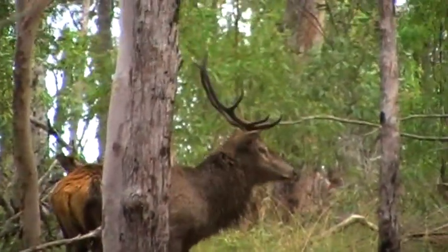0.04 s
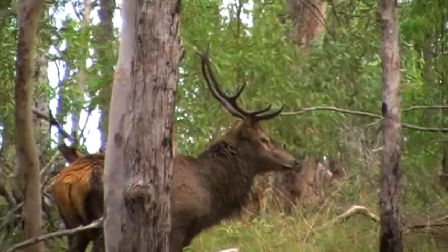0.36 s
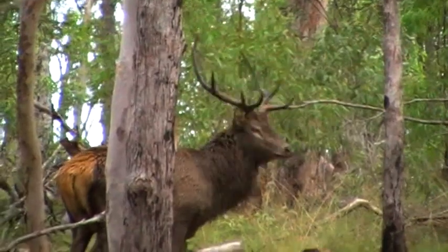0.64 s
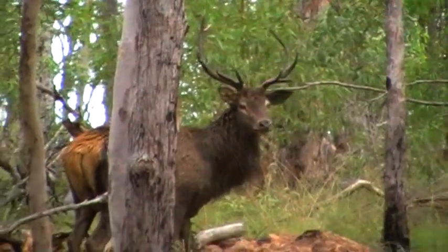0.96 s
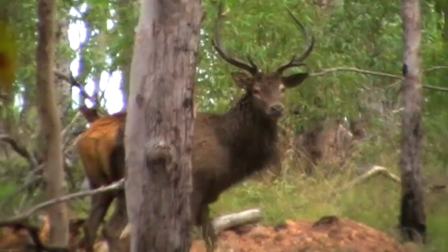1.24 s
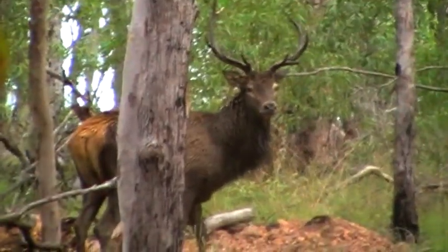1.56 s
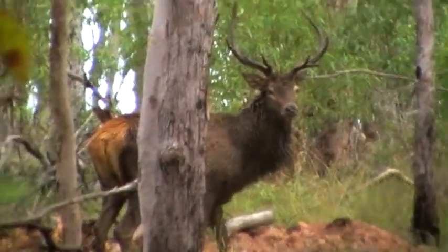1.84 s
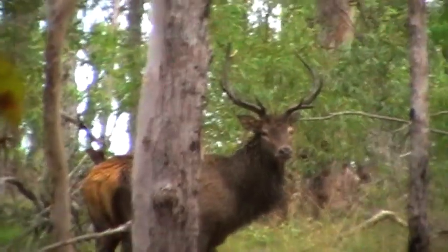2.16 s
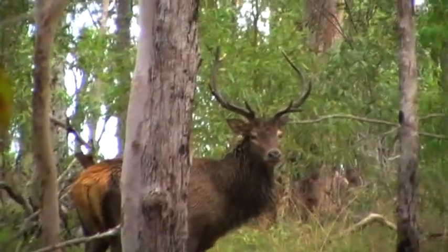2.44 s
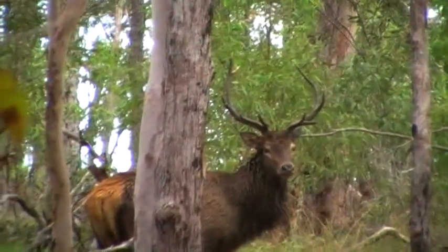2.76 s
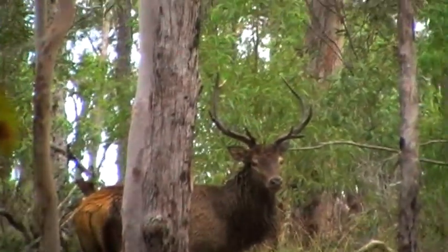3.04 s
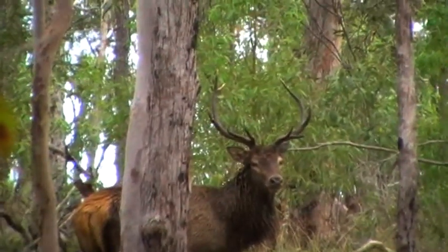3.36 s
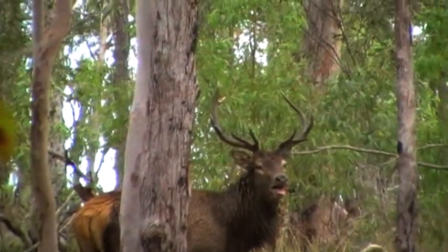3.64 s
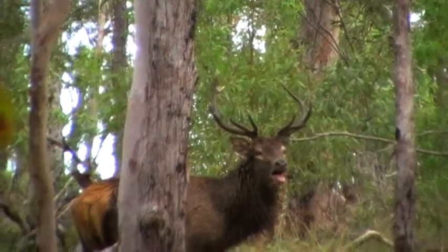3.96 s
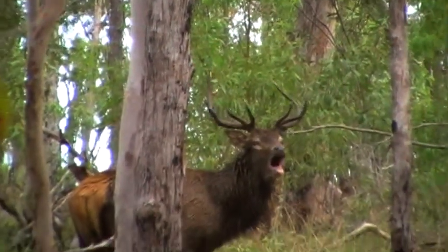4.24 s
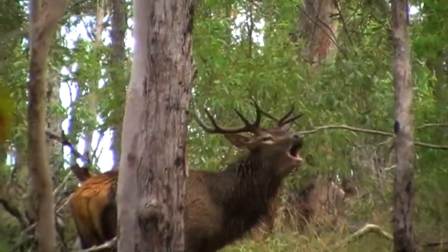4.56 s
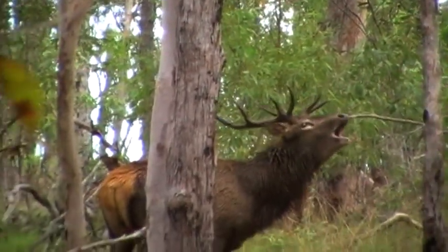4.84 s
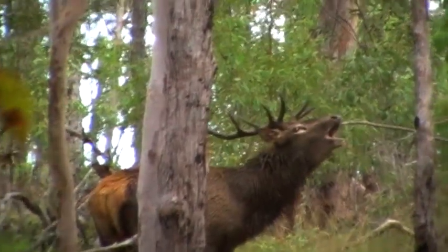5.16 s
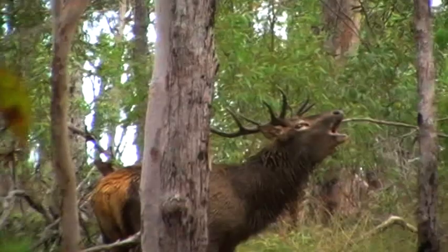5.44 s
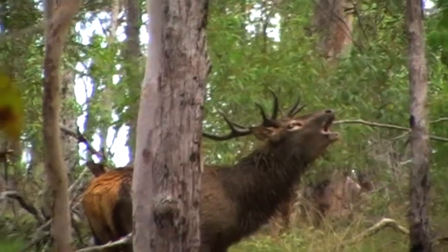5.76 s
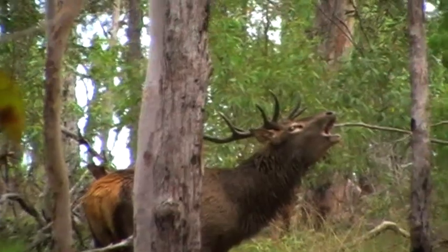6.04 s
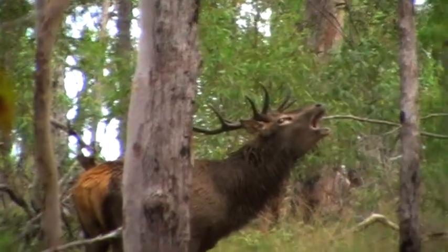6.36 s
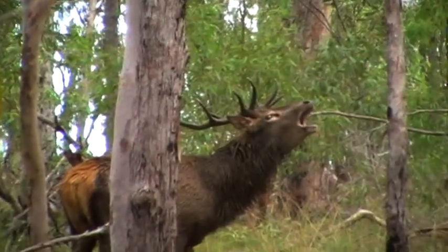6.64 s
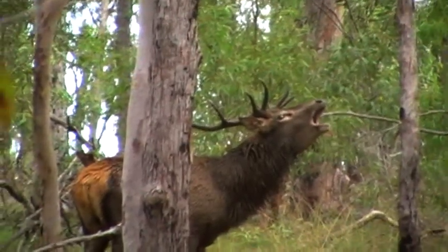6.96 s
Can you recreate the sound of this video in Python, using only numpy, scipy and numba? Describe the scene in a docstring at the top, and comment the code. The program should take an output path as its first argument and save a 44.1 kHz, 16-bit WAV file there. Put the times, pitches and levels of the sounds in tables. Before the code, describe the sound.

A deer stag roars outdoors among trees, a little to the right. Before it calls, there is only low forest air, faraway chirping birds, some slight wooden ticks and the camera's thin whine. Just past halfway, a short creaky growl deepens and swells into one long, loud bellow, rising and dipping in pitch and growing raspy. The trunks scatter the call lightly, and a few chirps come through at the end.

```python
"""Far birds chirp and a few twigs tick over the hush of open woodland and a faint camera whine.
Then a red deer stag roars: a rattling growl that drops as the larynx sinks, opening into a long
bellow that wavers in pitch and turns hoarse. Snapping vocal folds and puffs of air ring the throat,
mouth and lips, and the tree trunks scatter the voice."""
import sys
import numpy as np
from scipy import signal
from scipy.fft import rfft, irfft
from scipy.io import wavfile
from scipy.ndimage import uniform_filter1d
from numba import njit

SR = 44100
rng = np.random.default_rng(int(sys.argv[2]) if len(sys.argv) > 2 else 0)


def output_pcm(signal):
    """Save a mono or channel-first signal as 16-bit PCM at the path in sys.argv[1].

    Samples are clipped to [-1, 1] before scaling.
    """
    pcm = np.clip(np.atleast_2d(signal).T, -1, 1) * 32767
    wavfile.write(sys.argv[1], SR, np.round(pcm).astype(np.int16))


N = 317961
TIME = np.arange(N) / SR


def from_db(db):
    """Decibels to gain."""
    return 10 ** (np.asarray(db) / 20)


def unit_power(x):
    """Normalise to an RMS of 1."""
    return x / np.sqrt(np.mean(x ** 2) + 1e-20)


def automation(points):
    """Straight lines through (time, value) breakpoints, sample by sample."""
    return np.interp(TIME, *np.transpose(points))


def at_hz(points, hz):
    """Read each column of a spectrum on a log-frequency axis."""
    knots, *columns = np.transpose(points)
    return [np.interp(np.log(hz), np.log(knots), column) for column in columns]


def ramp(start, length):
    """A linear fade from 0 to 1."""
    return np.clip((TIME - start) / length, 0, 1)


def gesture(start, attack, hold, release):
    """An envelope that rises from 0 to 1, holds and falls back; times in seconds."""
    return ramp(start, attack) - ramp(start + attack + hold, release)


def drift(rate):
    """A random modulator that glides to a new value `rate` times a second."""
    knots = rng.standard_normal(4096)
    return np.interp(TIME * rate, np.arange(len(knots)), knots)


def band(x, low, high, order=2):
    """Butterworth band-pass."""
    sos = signal.butter(order, [low, min(high, SR / 2 - 1)], "band", fs=SR, output="sos")
    return signal.sosfilt(sos, x + 1e-18)


def levelled(x, window_s, amount=1):
    """A leveller: pulls the short-term power towards 1, fully at amount 1."""
    x, size = unit_power(x), int(window_s * SR)
    power = np.abs(uniform_filter1d(uniform_filter1d(x * x, size), size))
    return x / (power + 1e-4) ** (amount / 2)


@njit
def two_pole(x, angle, radius):
    """Resonant filter with a peak gain of 1 and a movable centre."""
    y = np.zeros(len(x))
    for i in range(2, len(x)):
        drive = (1 - radius ** 2) / 2 * (x[i] - x[i - 2])
        y[i] = drive + 2 * radius * np.cos(angle[i]) * y[i - 1] - radius ** 2 * y[i - 2] + 1e-18
    return y


def resonance(x, hz, width):
    """One resonance, with centre and width in Hz."""
    return two_pole(x, 2 * np.pi * hz / SR * np.ones(N), np.exp(-np.pi * width / SR))


def body(x, modes, scale=1):
    """Parallel resonances of alternating polarity."""
    return sum((-1) ** k * from_db(db) * resonance(x, hz * scale, width)
               for k, (hz, width, db) in enumerate(modes))


def wandering(x, modes, scale, alternate=True):
    """Parallel resonances that each stray in level and pitch; equal polarity leaves dips between them."""
    out = 0
    for k, (hz, width, db) in enumerate(modes):
        gain = from_db(db + 2.5 * drift(7))
        centre = hz * scale * (1 + .008 * drift(7))
        out = out + (-1) ** (k * alternate) * gain * resonance(x, centre, width)
    return out


# ambience bed: (frequency [Hz], mid density [dB re 1/Hz], side density [dB re 1/Hz])
HUSH_SPECTRUM = [(25, -102.8, -100), (49, -98.5, -99), (86, -89.5, -85.5), (260, -95, -84.5),
                 (437, -97.5, -87), (1410, -100.5, -97), (2560, -102.8, -106.3), (3700, -105.9, -109.9),
                 (5740, -104.9, -111.9), (7450, -104.6, -112.0), (7900, -109.4, -109.9),
                 (10030, -116.0, -118.1), (13000, -121.6, -123.0), (15500, -124.7, -125.3)]


def hush(flutter_db):
    """Leaves and far air: half-octave bands of noise, each stirring a little on its own."""
    out, edges = 0, 16 * 2 ** np.arange(0, 10.5, .5)
    white = rng.standard_normal((2, 2, N)) * np.sqrt(SR / 2)
    for k, (low, high) in enumerate(zip(edges, edges[1:])):
        mid, side = band(white[k % 2], low, high, order=3)
        mid_db, side_db = at_hz(HUSH_SPECTRUM, np.sqrt(low * high))
        stereo = from_db(mid_db) * mid + from_db(side_db) * side * [[1], [-1]]
        out = out + from_db(flutter_db * drift(11)) * stereo
    return out


# motor whines: (centre [Hz], width [Hz], level [dB], throb depth [0-1])
MOTOR_WHINES = [(87.5, 4.9, -74, 0.1), (1078, 17, -71.5, 0.24), (2378, 140, -78, .95),
                (9420, 830, -80.5, 0.36)]


def camera_motor(throb_hz):
    """Narrow, unsteady whines; the high ones pulse in short, regular pips."""
    throb = unit_power(np.abs(np.cos(np.pi * throb_hz * (TIME - .024))) ** 9.2)
    out = 0
    for hz, width, db, depth in MOTOR_WHINES:
        noise = band(rng.standard_normal(N), hz - width / 2, hz + width / 2)
        out = out + from_db(db) * levelled(noise, .02, amount=.8) * (1 + depth * (throb - 1))
    return out


def far_chatter(calls_db, twitter_db, drone_db):
    """A wash of distant calls, a twitter around one note and a low drone fade over the first second."""
    calls = from_db(calls_db) * unit_power(band(rng.standard_normal(N), 1000, 2000, order=3))
    flicker_db = 3.3 * drift(39.3)
    twitter = from_db(twitter_db + flicker_db) * unit_power(band(rng.standard_normal(N), 1645, 1800))
    drone = from_db(drone_db) * levelled(band(rng.standard_normal(N), 173, 182.3), .086)
    return (calls + twitter + drone) * (1 - ramp(.015, .99))


# bird cues: (time [s], length [s], start pitch [Hz], end pitch [Hz], level [dB], warble depth [Hz])
BIRD_CHIRPS = [(0.0, .035, 1810, 1900, -57, 23), (0.026, 0.043, 1830, 1684, -59, 40),
               (.085, 0.055, 1816, 1710, -61, 40), (0.242, 0.063, 1777, 1625, -56.5, 15),
               (.402, .03, 1854, 1760, -58.5, 20), (0.427, 0.026, 1910, 1580, -53.5, 23),
               (0.448, .046, 2007, 1190, -56, 25), (0.561, 0.059, 1790, 1546, -55.5, 20),
               (1.338, .05, 1570, 1680, -66, 50), (1.57, .05, 2260, 1700, -66, 90),
               (1.622, .045, 1610, 2200, -68, 90), (1.672, 0.041, 2580, 2020, -62, 50),
               (1.852, 0.046, 2620, 1880, -62.5, 50), (1.998, .046, 2600, 1930, -61, 50),
               (3.498, 0.0435, 2600, 1830, -53.5, 200), (3.587, 0.034, 2520, 2230, -63, 98),
               (3.772, 0.034, 2540, 2400, -64, 40), (3.916, .036, 2560, 2370, -61.5, 40),
               (6.977, .03, 2092, 1761, -44, 150), (7.12, .03, 2080, 1692, -48, 150),
               (7.159, 0.032, 2064, 1610, -45, 150)]


def birds():
    """Short slurred whistles, most of them falling, some with a harsh warble."""
    out, warble = np.zeros(N), drift(400)
    for start, length, first_hz, last_hz, db, warble_hz in BIRD_CHIRPS:
        at = np.flatnonzero((TIME >= start) & (TIME < start + length))
        progress = np.linspace(0, 1, len(at))
        glide = first_hz + (last_hz - first_hz) * progress ** 1.29   # gathers speed
        phase = 2 * np.pi * np.cumsum(glide + warble_hz * warble[at]) / SR
        out[at] += from_db(db) * np.sin(np.pi * progress) * np.sin(phase)
    return out


# twig cues: (time [s], level [dB])
TWIG_TICKS = [(1.543, -53.5), (1.907, -59), (3.276, -59.5), (4.175, -60)]
# ring of the wood: (centre [Hz], width [Hz], gain [dB])
TWIG_MODES = [(670, 190, 13), (1510, 1000, 0)]


def twigs():
    """Dull wooden ticks that die within a few cycles."""
    clicks = np.zeros(N)
    for start, db in TWIG_TICKS:
        clicks[int(start * SR)] = from_db(db + 27.5)   # make-up gain for the filters
    return band(body(clicks, TWIG_MODES), 300, 3000)


def woodland(x, wet_db, t60, low_hz, high_hz):
    """Stereo reverb: trunks scatter a thin tail, different at each ear; long waves bend round them."""
    tail = rng.standard_normal((2, SR)) * from_db(-60 * TIME[:SR] / t60)
    tail = band(tail / np.sqrt(np.sum(tail[0] ** 2)), low_hz, high_hz, order=1)
    return x + from_db(wet_db) * signal.fftconvolve(x[None], tail, axes=1)[:, :N]


def scattered(x, wet_db, t60):
    """Mono reverb: trunks near the stag throw the voice back from its own direction."""
    t = TIME[:SR]
    tail = rng.standard_normal(SR) * from_db(-60 * t / t60) * (t > .012)
    tail = band(tail / np.sqrt(np.sum(tail ** 2)), 240, 13500, order=1)
    return x + from_db(wet_db) * signal.fftconvolve(x, tail)[:N]


# early reflections off the ground and the nearest trunk: (delay [s], gain [dB])
REFLECTIONS = [(.0037, -10), (0.021, -11.5)]


def echoed(x):
    """Near reflections fill the gaps between the pulses."""
    return x + sum(from_db(db) * np.interp(TIME - delay, TIME, x) for delay, db in REFLECTIONS)


GROWL_START_S, AIR_LEAD_S = 4.222, .048   # air flows just before the folds start
OPEN_S, OPENING_S = 4.47, .07   # the mouth opens and the growl becomes the bellow
# envelopes of the bellow: (start [s], attack [s], hold [s], release [s])
FRESH = (OPEN_S, .15, .14, .42)   # the first clear, ringing stretch
LINGER = (OPEN_S, .14, .11, .041)   # the depth of the growl hangs on
NARROW = (5.71, .33, .43, .3)   # the blare thins and rings harder
HOARSE = (6.41, .08, .26, .11)   # the voice breaks up


def growl_age():
    """Seconds since the growl began, held once the mouth is open."""
    return np.clip(TIME, GROWL_START_S, OPEN_S + OPENING_S) - GROWL_START_S


# melody of the bellow: (time [s], pitch [Hz])
BELLOW_PITCH = [(4.55, 130), (4.65, 143), (4.73, 149.2), (4.85, 146), (4.94, 153.7), (5.05, 159.2),
                (5.12, 169), (5.15, 170.2), (5.25, 167.7), (5.31, 163.3), (5.38, 160.8), (5.43, 161.2),
                (5.51, 164.3), (5.62, 174.3), (5.8, 183.5), (5.96, 171.6), (6.13, 172), (6.2, 169.3),
                (6.29, 165), (6.53, 157.1), (6.63, 151.8), (6.72, 154.1), (6.86, 168.2), (6.94, 168.6),
                (7.16, 189.2), (7.21, 184.5)]


def voice_pitch(first_hz=41, rattle_hz=102, speed_up_s=.04):
    """Slow pulses speed up to a steady rattle, then leap to the pitch of the bellow."""
    rattle = rattle_hz + (first_hz - rattle_hz) * np.exp(-growl_age() / speed_up_s)
    return rattle + (automation(BELLOW_PITCH) - rattle) * ramp(OPEN_S, OPENING_S / 2)


def roughness(in_growl=.48, in_bellow=.12):
    """Grit from 0 to 1: high in the growl, lowest just after it, up again in the hoarse stretch."""
    base = in_growl + (in_bellow - in_growl) * ramp(*FRESH[:2])
    return base - .09 * gesture(*FRESH) + .15 * gesture(*HOARSE)


def vocal_folds(jitter_s, shimmer, waver):
    """The folds snap shut once a cycle; roughness scatters timing and force and lets air puff through."""
    rough = roughness()
    pitch = voice_pitch() * (1 + waver * rough * drift(70))
    cycles = np.cumsum(pitch * (TIME >= GROWL_START_S)) / SR
    at = np.flatnonzero(np.diff(np.ceil(cycles)) > 0)
    count = np.arange(len(at))
    late, force = rng.standard_normal((1024, 2))[:len(at)].T
    on_beat = at + (count - cycles[at]) * SR / pitch[at]
    when = np.clip(on_beat + late * rough[at] * jitter_s * SR, 0, N - 2)
    limp = .029 * gesture(*HOARSE)[at] * (-1) ** count   # hoarse pulses alternate strong and weak
    size = np.exp(shimmer * rough[at] * force) * (1 + limp)
    snaps = np.zeros(N)
    snaps[when.astype(int)] += size * (1 - when % 1)   # each snap is shared between two samples
    snaps[when.astype(int) + 1] += size * (when % 1)
    airflow = ramp(GROWL_START_S - AIR_LEAD_S, AIR_LEAD_S) * rough * np.sqrt(pitch / SR)
    puffs = airflow * np.exp(-1.5 * (cycles % 1)) * rng.standard_normal(N)
    return snaps, puffs


def register(voice, low, high, db, levelling=1):
    """One band of the voice, levelled and set to its own fader, trembling a little."""
    return from_db(db + drift(35)) * levelled(band(voice, low, high, order=4), .038, levelling)


# resonances of the spurt at its start: (centre [Hz], width [Hz], gain [dB])
SPIT_MODES = [(7200, 53, -3), (8340, 70, 2), (9540, 150, -3)]


def spit(source, start=4.495, attack=.03, hold=.074, release=.086):
    """A focused hiss spurts through the parting lips and falls in pitch."""
    fall = 1 - .64 * np.clip(TIME - start, 0, attack + hold + release)
    hiss = register(body(source, SPIT_MODES, fall), 5400, 10700, db=-52.5)
    return gesture(start, attack, hold, release) * hiss


# lip resonances, clear and hoarse: (centre [Hz], width [Hz], gain [dB])
CLEAR_LIP_MODES = [(6650, 126, 1.5), (7680, 420, -1.5), (8080, 440, -4.5), (8650, 500, -5.5),
                   (12800, 1500, -29)]
HOARSE_LIP_MODES = [(6761, 252, -10), (7845, 140, 1.5), (8880, 92, -2.5), (9700, 210, -10),
                    (12000, 2500, -24.5)]
# moving lips retune the clear set: (time [s], tuning [ratio])
LIP_TUNING = [(4.7, 1.045), (5.0, 1.03), (5.12, 1.0), (5.55, .995), (6.05, 1.025)]
# sizzle fader: (time [s], level [dB])
SIZZLE_FADER = [(4.55, -58), (4.75, -57), (5.0, -56.5), (5.42, -59.5), (5.75, -58), (6.1, -61),
                (6.36, -64.5), (6.5, -55.5), (6.75, -56), (7.05, -60.5), (7.19, -55.5)]


def sizzle(source):
    """The pulses ring resonances at the lips, which regroup as the voice turns hoarse."""
    clear = levelled(wandering(source, CLEAR_LIP_MODES, automation(LIP_TUNING)), .05)
    hoarse = levelled(body(source, HOARSE_LIP_MODES), .05)
    crossfade = ramp(6.21, .25)
    lips = (1 - crossfade) * clear + crossfade * hoarse
    blurred = scattered(echoed(lips), wet_db=-3, t60=.3)
    return register(blurred, 6300, 15000, automation(SIZZLE_FADER))


# melody of the second tone: (time [s], pitch [Hz])
SECOND_PITCH = [(6.42, 180.3), (6.55, 186.8), (6.65, 192), (6.73, 185.4), (6.86, 200)]
# its partials: (harmonic [number], level [dB])
SECOND_PARTIALS = [(1, -57.5), (2, -59), (3, -52.5), (4, -60), (6, -57)]


def second_tone(waver):
    """Beside the hoarse bellow, another part of the folds flutters at an unsteady pitch of its own."""
    pitch = automation(SECOND_PITCH) * (1 + waver * drift(60))
    phase = 2 * np.pi * np.cumsum(pitch) / SR
    tone = sum(np.sqrt(2) * from_db(db + 2 * drift(28)) * np.sin(k * phase) for k, db in SECOND_PARTIALS)
    return gesture(start=6.4, attack=.22, hold=.046, release=.2) * tone


# sweep of the blare: (time [s], centre [Hz])
BLARE_SWEEP = [(4.5, 2660), (4.63, 2876), (4.7, 2800), (4.76, 2715), (4.85, 2817), (4.93, 2805),
               (5.04, 2740), (5.14, 2557), (5.65, 2482), (6.15, 2452), (6.8, 2726), (7.1, 2560)]


def blare_centre():
    """Jaw and tongue steer the blare, one strong, focused resonance of the mouth."""
    return automation(BLARE_SWEEP)


# growl formants: (start centre [Hz], end centre [Hz], width [Hz], gain [dB])
GROWL_FORMANTS = [(273, 205, 38, 5.5), (620, 510, 27, 12.5), (816, 636, 33, 9.5), (1244, 1048, 39, 9.5),
                  (1486, 1100, 35, 11), (1717, 1300, 43, 12), (2230, 1750, 29, 8.5), (2460, 2160, 79, 6.5),
                  (2910, 2800, 61, 5.5), (3480, 2850, 91, 0), (4150, 3400, 140, -6),
                  (4340, 3950, 230, -10.5), (6200, 5400, 410, -14.5), (7850, 7400, 1600, -15.5)]


def growl(source, sink_s):
    """Creaky pulses swell while the larynx sinks, lengthening the throat and lowering its formants."""
    larynx_height = (1 - ramp(GROWL_START_S, sink_s)) ** 1.48   # drops fast at first
    modes = [(last + (first - last) * larynx_height, width, db)
             for first, last, width, db in GROWL_FORMANTS]
    voice = echoed(body(source, modes))
    chest = from_db(-55.5 + 59 * growl_age()) * levelled(band(voice, 130, 660, order=3), .078)
    mouth = from_db(-47.5 + 12.5 * growl_age()) * levelled(band(voice, 600, 9500, order=3), .03)
    blare = levelled(band(resonance(voice, blare_centre(), 200), 2720, 3400), .014)
    attack = ramp(GROWL_START_S - AIR_LEAD_S, .062) ** 2
    creep_in = from_db(-45.5) * ramp(4.402, .19)
    return attack * (chest + mouth) + creep_in * blare


# faders of the three upper bands: (time [s], level [dB])
BLARE_FADER = [(4.5, -44.5), (4.54, -43.5), (4.59, -37), (4.69, -34), (4.7, -39), (4.74, -31.5),
               (4.94, -36.5), (4.96, -32), (5.42, -40.5), (5.6, -37), (5.67, -32.5), (5.71, -37.5),
               (6.14, -37.5), (6.46, -45), (6.51, -40), (6.87, -39), (7.06, -36.5), (7.2, -40)]
TREBLE_FADER = [(4.5, -57), (4.64, -46.5), (4.94, -43.5), (5.44, -48.5), (5.72, -45), (5.84, -48.5),
                (5.85, -53), (5.91, -47), (6.1, -48.5), (6.42, -51.5), (6.5, -44), (6.96, -44.5),
                (6.97, -42.5), (7.2, -46)]
RASP_FADER = [(4.52, -62), (4.55, -66), (4.75, -57.5), (5.14, -59.5), (5.19, -54), (5.35, -62),
              (6.33, -58.5), (6.41, -64), (6.45, -56.5), (7.21, -52)]
# lower bands: (low edge [Hz], high edge [Hz], base level [dB], swell [dB/semitone],
# levelling [0-1], lift while the growl lingers [dB])
LOW_REGISTERS = [(111, 196, -59, 5, 1, 3), (260, 790, -47, 2, 0.27, 5), (975, 2020, -47, 1.5, 0.79, -1.5)]


def with_effort(voice, easy_hz=165, crescendo_db_per_s=.88):
    """The harder the stag pushes, the higher the pitch and the fuller the lows; upper bands ride on top."""
    out = register(voice, 2080, 3300, automation(BLARE_FADER))
    out += register(voice, 3300, 4550, automation(TREBLE_FADER))
    out += register(voice, 4450, 6200, automation(RASP_FADER))
    semitones = 12 * np.log2(automation(BELLOW_PITCH) / easy_hz)
    push_db = crescendo_db_per_s * (TIME - OPEN_S) + gesture(*HOARSE)   # hoarseness adds 1 dB
    for low, high, base_db, swell, levelling, lift_db in LOW_REGISTERS:
        db = base_db + push_db + swell * semitones + lift_db * gesture(*LINGER)
        out += register(voice, low, high, db, levelling)
    return out


# throat formants, plus a narrow fixed ring near 800 Hz: (centre [Hz], width [Hz], gain [dB])
BELLOW_RESONANCES = [(185.4, 14, 5.5), (371.4, 37.5, 9), (528.2, 45, 9.5), (708, 75, -5), (798, 12, 15),
                     (1198.7, 49, 12), (1502.5, 24, 14.5), (1747, 27, 4.5), (2075, 59, -3.5),
                     (2467, 165, 3.5), (2740, 44, 8), (2986, 150, 3)]
# mouth formants: (centre [Hz], width [Hz], gain [dB])
MOUTH_FORMANTS = [(3525, 66, -8), (3682, 90, -5), (4133, 100, -12), (4598, 59, -17), (4980, 150, -19.5),
                  (5280, 120, -12), (5670, 69, -17.5)]
# the tongue retunes the middle formants: (time [s], tuning [ratio])
VOWEL_TUNING = [(4.55, 1.02), (4.65, 1.05), (4.8, 1.06), (5.0, 1.01), (5.3, 1.006), (5.7, 1.02),
                (6.05, 1.005), (6.35, 1.02), (6.65, 0.98), (7.15, 1.04)]
# a side cavity swallows one band of the voice: (time [s], centre [Hz])
CAVITY_NOTCH = [(4.6, 1660), (5.1, 1780), (5.7, 2042), (6.05, 2170), (6.5, 2124), (7.0, 2094)]


def bellow(source):
    """Fast pulses sound the long throat and a narrow fixed ring; the open mouth blares on top."""
    settling = 1 + .14 * (1 - ramp(4.7, .21))   # the lowest formants start sharp
    lows = [(hz * settling if hz < 600 else hz, width, db)
            for hz, width, db in BELLOW_RESONANCES if hz < 1000]
    mids = [mode for mode in BELLOW_RESONANCES if 1000 <= mode[0] < 1950]
    highs = [mode for mode in BELLOW_RESONANCES if mode[0] >= 1950]
    core = body(source, lows) - wandering(source, mids, automation(VOWEL_TUNING))
    core += wandering(source, highs, .99)

    blare_hz = blare_centre()
    blare_db = 7 + 13 * gesture(*FRESH) + 6 * gesture(*NARROW) - 21.5 * gesture(*HOARSE)
    blare = from_db(blare_db) * resonance(resonance(source, blare_hz, 220), blare_hz, 220)
    tracking = (blare_hz / np.mean(blare_hz[TIME > OPEN_S])) ** .24   # the mouth partly follows the blare
    mouth = wandering(source, MOUTH_FORMANTS, tracking, alternate=False)
    mouth = scattered(band(mouth, 3200, 6500), wet_db=-5, t60=.25)

    voice = core + mouth - blare
    voice -= resonance(voice, automation(CAVITY_NOTCH), 520)
    voice -= .72 * gesture(*NARROW) * resonance(voice, 2872, 460)   # damp the band above the blare
    return with_effort(scattered(echoed(voice), wet_db=-10.5, t60=.7))


# the stag's pan: (frequency [Hz], left minus right [dB], left phase lead [rad])
STAG_PAN = [(172, -4.5, -0.34), (500, -4, 0.24), (1300, -1.5, 0.15), (2600, -0.7, -.04),
            (4200, -1.5, -0.25), (7260, 3, 0.55), (9100, -2, -1.7), (10000, -4, -.3)]


def stag():
    """The growl crossfades into the bellow as the mouth opens, a little to the right."""
    snaps, puffs = vocal_folds(jitter_s=.00009, shimmer=.28, waver=.0151)
    rattle = growl(snaps + .7 * puffs, sink_s=.23)
    # turbulence comes and goes, and takes over from the pulses towards the treble
    turbulence = 2.4 * from_db(3 * drift(12)) * band(puffs, 2800, 6000)
    source = snaps + 1.3 * puffs + turbulence
    roar = bellow(source) + sizzle(source + 1.5 * puffs) + second_tone(waver=.007)
    opened = ramp(OPEN_S, OPENING_S) * np.pi / 2
    rattle = scattered(np.cos(opened) * rattle, wet_db=-7.5, t60=.4)
    voice = rattle + np.sin(opened) * roar + spit(source)
    stereo = woodland(voice, wet_db=-16, t60=1.0, low_hz=960, high_hz=8000)
    pan_db, lead = at_hz(STAG_PAN, np.linspace(1, SR / 2, N + 1))
    ears = np.array([[.5], [-.5]])
    pan = from_db(pan_db * ears) * np.exp(1j * lead * ears)
    return irfft(rfft(stereo, 2 * N) * pan)[:, :N]


def scene():
    """The stag over the small sounds of the wood."""
    small = birds() + twigs() + far_chatter(calls_db=-66, twitter_db=-69, drone_db=-70)
    small = woodland(small, wet_db=-5, t60=.55, low_hz=400, high_hz=5000)
    return stag() + small + hush(flutter_db=.1) + camera_motor(throb_hz=25)


def record(dry):
    """A steep high cut at 15.7 kHz."""
    return signal.sosfilt(signal.ellip(10, .1, 80, 15700, fs=SR, output="sos"), dry)


dry = scene()
out = record(dry)
output_pcm(out)
```